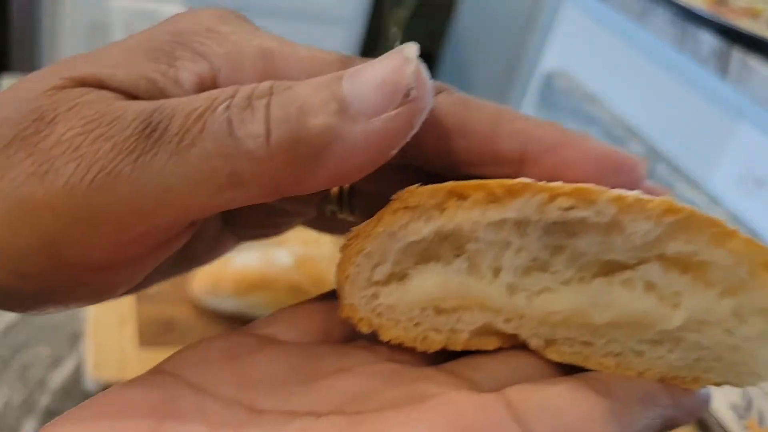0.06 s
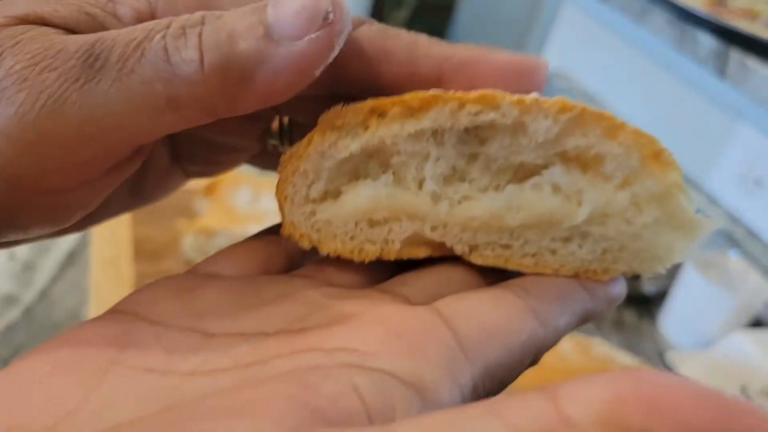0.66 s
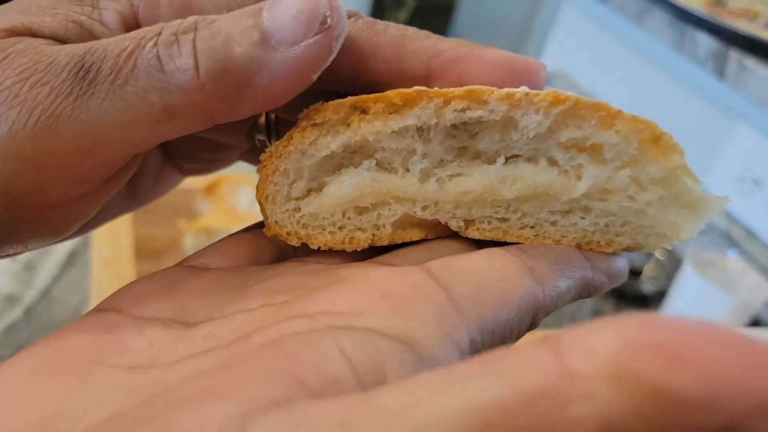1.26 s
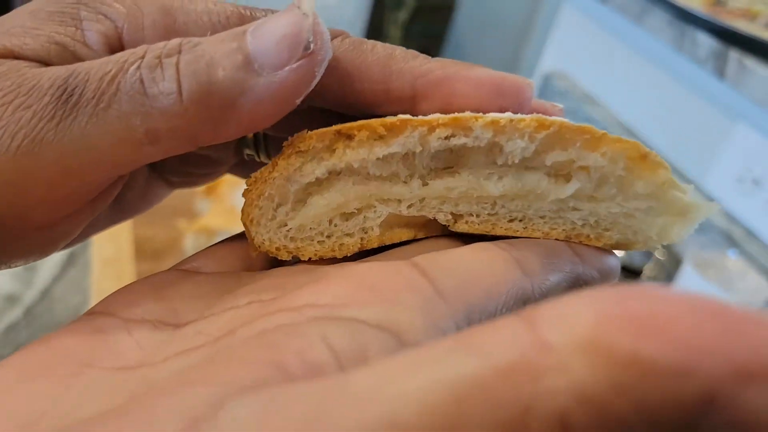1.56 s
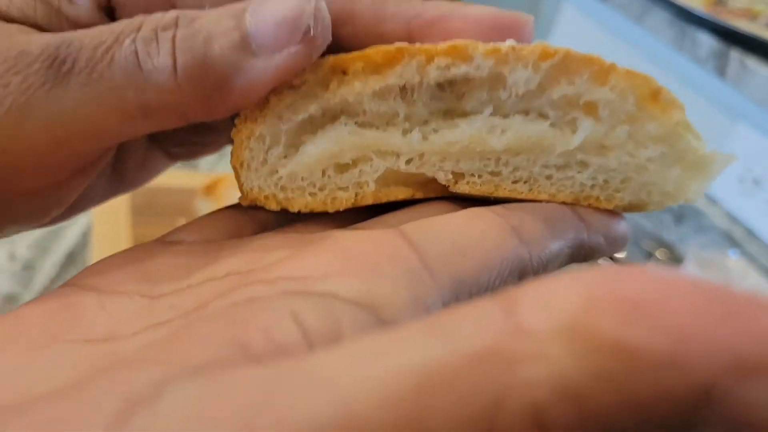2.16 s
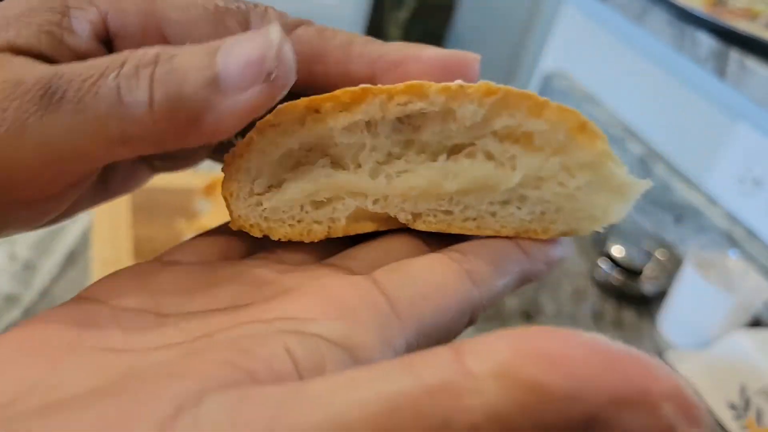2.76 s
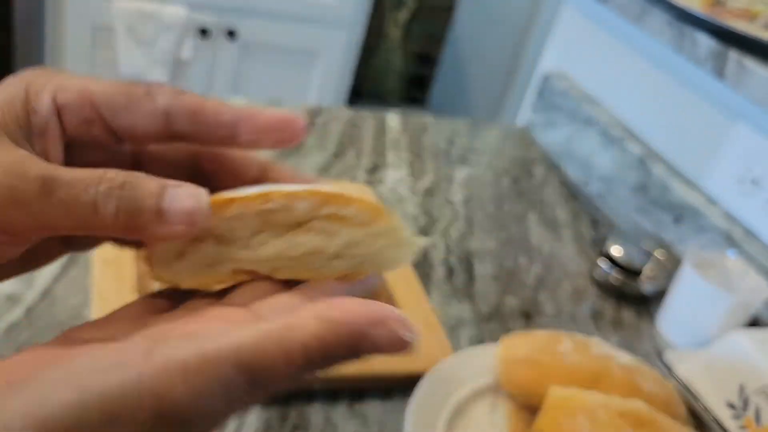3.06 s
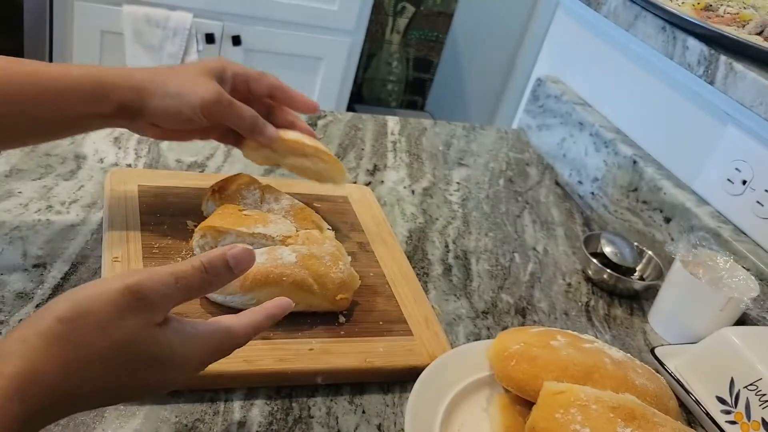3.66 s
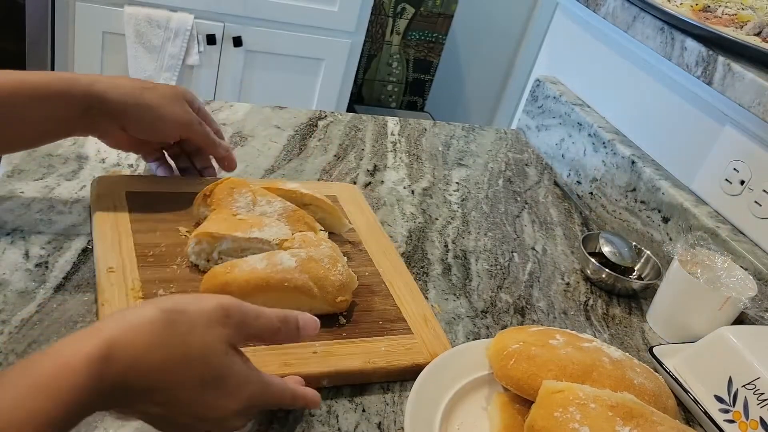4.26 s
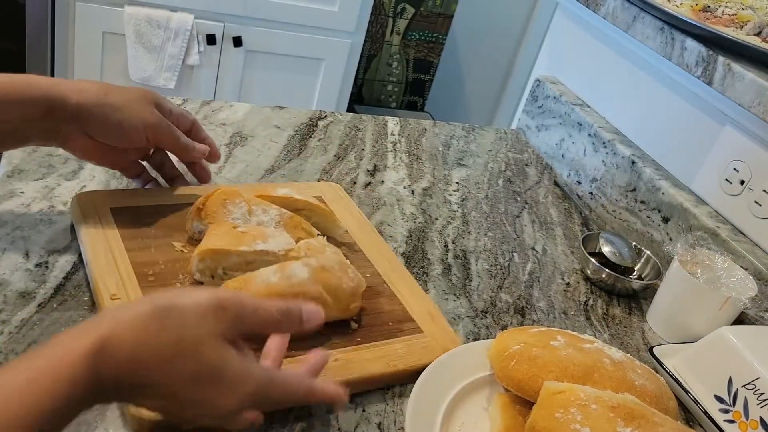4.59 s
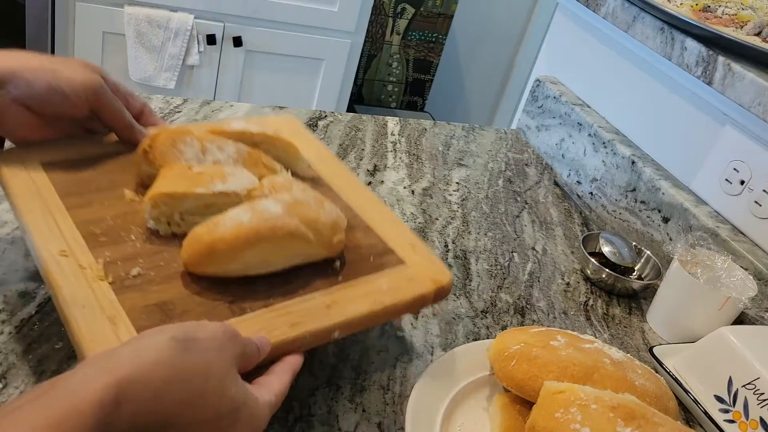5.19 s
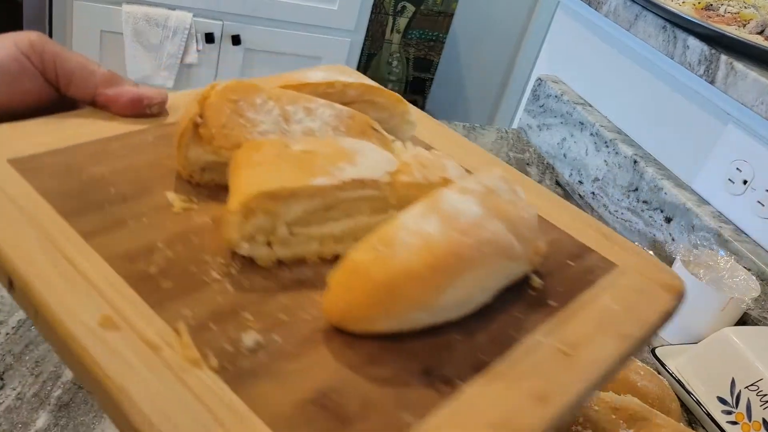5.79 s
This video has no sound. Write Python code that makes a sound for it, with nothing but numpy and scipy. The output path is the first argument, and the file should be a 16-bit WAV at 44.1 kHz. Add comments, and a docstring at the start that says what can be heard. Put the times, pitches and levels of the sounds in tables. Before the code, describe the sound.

In a quiet kitchen with a faint appliance hum, hands squeeze crusty bread close to the microphone. The crust crackles in two waves, the second stronger, then gives a few last ticks. A small clink and light taps follow as the bread is set down. A little further off, a wooden board is pushed over a stone counter with a loud judder, a brief squeak and several knocks.

```python
"""In a quiet, humming kitchen, two hands squeeze a piece of crusty bread close up. The crust crackles and
snaps in two waves, then gives a few last cracks and faint ticks as the grip eases. A small clink follows,
and at about 4 s the bread is set down on a wooden board. Pushed over a stone counter, the board sticks and
slips, first in a judder, then in a squeak; it knocks and is lifted. Hard walls answer bread and board."""
import sys
import numpy as np
from scipy import signal
from scipy.fft import rfft, irfft, next_fast_len
from scipy.io import wavfile
from scipy.ndimage import uniform_filter1d, minimum_filter1d, map_coordinates

SR = 44100
rng = np.random.default_rng(int(sys.argv[2]) if len(sys.argv) > 2 else 0)


def to_wav(s):
    """Save 16-bit WAV."""
    ch = np.atleast_2d(s).T  # columns
    pcm = np.round(np.clip(ch, -1, 1) * 32767)  # PCM
    wavfile.write(sys.argv[1], SR, pcm.astype(np.int16))


N = 266099

# Stereo image. Each row: frequency in Hz, likeness of left and right from -1 to 1.
STEREO_LIKENESS = [(60, 0.66), (180, 0.83), (300, 0.58), (450, -0.092), (800, -0.2), (1600, -.3),
                   (3000, -0.016), (15000, 0)]
# Reverb length. Each row: frequency in Hz, seconds to fall by 60 dB.
KITCHEN_DECAY = [(100, .5), (900, 0.53), (2000, 0.44), (4000, 0.41), (8000, 0.39), (15000, 0.087)]
# Appliance hum. Each row: pitch in Hz, level in dB.
HUM_TONES = [(59.2, -71.5), (134.6, -75.5)]

# Noise colours. Each row: frequency in Hz, relative spectral density in dB.
WALL_EQ = [(80, 0), (400, -5), (900, -4), (2000, 0.5), (4000, -3), (8000, -1), (15000, -2.5)]  # the reverb tail
AIR_EQ = [(20, -40), (47, -14.5), (70, -4), (95, -13.5), (125, -4), (210, -17), (330, -11), (800, -16.5),
          (1100, -20.5), (2300, -28.5), (3500, -27), (7000, -30), (8000, -27.5), (9500, -39),
          (15500, -41.5), (16400, -50.5)]  # the room's air
RUSTLE_EQ = [(80, -19), (250, -1), (480, -4), (620, 1), (780, 0.5), (1100, -10.5), (2200, -18), (3500, -18),
             (7000, -27), (14000, -49)]  # moving hands
RUMBLE_EQ = [(20, -33), (45, -11), (62, 12), (95, -6.5), (200, -33), (600, -72)]  # the low end of that movement
WOOD_EQ = [(180, -58.5), (300, -21.5), (790, -9.5), (872, -20), (1160, -6), (1340, -12.5), (1500, -15.5),
           (1940, -13), (2880, -18), (3520, -16.5), (4170, -31), (5710, -37.5), (9000, -70), (11700, -88.5),
           (19800, -120)]  # the board's dense, short-lived modes
THUD_EQ = [(40, -35), (62, -7.5), (90, 1.5), (120, -1), (170, -1.5), (220, 0.5), (300, 3.5), (500, -4),
           (900, -48)]  # the weight under a knock
TICK_EQ = [(1200, -18), (2500, 4), (5500, 4.5), (7500, -2.5), (10000, -21), (12500, -24), (16000, -31.5)]  # hard contact with the stone
TAP_EQ = [(150, -14.5), (700, 7.5), (1500, -0.5), (3000, 2), (6000, -2), (10000, -9), (16000, -16.5)]  # a light touch
CRUMB_EQ = [(50, -10), (130, -2), (250, -4), (700, 2), (1100, -2), (1700, 1), (2400, -14.5), (4000, -31)]  # the soft inside of the bread
CRUST_EQ = [(530, -43.5), (900, -16), (1110, -15.5), (1520, -14.5), (1820, -16.5), (3150, 0), (4170, -2),
            (4710, 1), (8150, 0), (10300, -7), (12600, -3), (15200, -3.5), (16500, -28)]  # its brittle shell

# Hands and arms move. Each row: fastest moment in seconds, rustle and rumble in dB, rise and fall in seconds.
HAND_MOVES = [(0.05, -72, -62, 0.4, 0.57), (2.19, -61, -63, 0.06, 0.11), (3.59, -55.5, -87, 0.12, 0.2),
              (4.15, -62, -80, 0.11, 0.1), (4.31, -68.5, -62.5, 0.1, 0.12)]
# Fingers, crumbs and board slide.
# Each row: fastest moment in seconds, rub and hiss in dB, rise and fall in seconds.
SLIDE_MOVES = [(4.085, -54.5, -67, 0.027, 0.063), (4.68, -27.5, -53, 0.06, 0.24),
               (5.11, -46.5, -58, 0.088, 0.031), (5.49, -54, -65.5, 0.15, 0.17)]
# The squeak's timbre. Each row: harmonic number, relative level in dB.
SQUEAK_HARMONICS = [(1, -26.5), (2, -22.5), (3, -1.5), (4, -24), (5, -25.5), (6, -29.5), (7, -37.5),
                    (8, -33.5)]
# The board's clear modes. Each row: pitch in Hz, bandwidth in Hz, relative level in dB.
BOARD_MODES = [(505, 24, -21), (632, 31, -7.5), (657, 11, -12.5), (694, 6.7, -11), (744, 12, -22.5),
               (873, 23, -1.5), (1032, 24, -3.5), (1100, 9, -21), (1304, 28, -1), (1402, 18, -19),
               (1790, 20, -8.5), (1905, 16, -9.5), (1973, 33, -6), (2250, 60, -14.5), (2446, 42, -12),
               (2496, 21, -8), (2680, 40, -11), (3080, 100, -16.5)]
# The board hits the counter.
# Each row: start in seconds, level in dB, thud and tick in dB relative to it, brightness in dB per octave.
BOARD_KNOCKS = [(4.594, -40, -20, -18.5, 8), (4.601, -26, -29, -13, 10), (4.648, -4, -20, -38, -6),
                (4.7815, -7.5, -17.5, -5.5, 8.5), (4.791, -6.5, -20.5, -35, 0), (4.968, -18.5, -19, -40, 0),
                (4.975, -13, -21, -42, -1.5), (5.097, -39.5, -5, -24.5, -3.5), (5.493, -31, -29, -17, 7.5)]

# Clicks. Each row: start in seconds, level in dB, dull body in dB relative to it, ring pitch in Hz.
BOARD_TOUCHES = [(4.0558, -43.5, -3.5, 3304), (4.0724, -49, -3, 3500), (4.0943, -46.5, -9.5, 1404),
                 (4.148, -53.5, -9.5, 599), (4.4335, -35, -13, 5550), (4.437, -35.5, -8, 13000),
                 (4.4996, -44, -15.5, 1780), (5.173, -45.5, -22.5, 12300)]  # bread and fingers touch the board
CARRY_CLINK = [(3.2253, -41.5, -6.5, 2720)]  # a pitched tick as the piece is carried off
CRUST_SNAPS = [(0.0398, -26, -14, 9300), (0.2179, -41.5, -28, 8000), (0.3316, -28, -22, 3530),
               (0.389, -28.5, -16.5, 9400), (0.4554, -31.5, -23, 6000), (0.4813, -29, -19.5, 8060),
               (0.5072, -29.5, -35, 12600), (0.5357, -31.5, -23, 4860), (0.5435, -32, -33, 8360),
               (0.5696, -33, -30, 6200), (0.6015, -38.5, -22, 7140), (1.3758, -32, -10.5, 5300),
               (1.3967, -25, -22, 6700), (1.4501, -26.5, -31, 7240), (1.4666, -25.5, -40, 8400),
               (1.5214, -27.5, -40, 12300), (1.5364, -25, -40, 8020), (1.5648, -20.5, -29, 8070),
               (1.5783, -16, -6.5, 7370), (1.6102, -21, -38, 6700), (1.6616, -23.5, -14, 4570),
               (1.7115, -34, -29, 5400), (1.7848, -34, -26, 5040), (1.8696, -28.5, -8.5, 3500),
               (1.1857, -55, -12, 5430), (2.2483, -51, -11, 5340), (2.5227, -35, -29, 3400),
               (2.8983, -48, -16, 5750)]  # the featured cracks of the crust
# The bread is squeezed. Each row: hardest press in seconds, crackle in dB, rise and fall in seconds.
BREAD_SQUEEZES = [(0.505, -48, 0.19, 0.115), (1.595, -36, 0.195, 0.17), (2.545, -62, 0.02, 0.08)]

SQUEEZE_SHAPE = 1.86  # 1 is a pointed swell, 2 a rounded one
FLAKE_HZ, FLAKE_SPREAD_OCTAVES, FLAKE_BODY_DB = 6500, 0.16, -32


def amp(db):
    """Decibels to gain."""
    return 10 ** (np.asarray(db) / 20)


def unit(x):
    """Scale to an rms of 1."""
    return x / np.sqrt(np.mean(x ** 2) + 1e-20)


def crest(x):
    """Scale a burst so that its loudest 2 ms peak near 1."""
    power = uniform_filter1d(np.mean(x ** 2, axis=0), size=88)
    return x / np.sqrt(4 * power.max())


def along(points, hz):
    """Read a curve on a log frequency axis."""
    knots_hz, values = np.transpose(points)
    return np.interp(np.log(hz + 1), np.log(knots_hz + 1), values)


def wobble(per_s):
    """A smooth random curve with per_s knots a second."""
    knots = rng.standard_normal(int(N * per_s / SR) + 4)
    return map_coordinates(knots, [np.arange(N) * per_s / SR])


def onset(t, attack_s):
    """A smooth fade-in from 0 to 1."""
    return 1 - np.exp(-(t / attack_s) ** 2)


def swell(t, peak_s, rise_s, fall_s, shape=1):
    """A gesture's level in dB: 0 at its peak, 20 down one rise before and one fall after."""
    away = np.maximum((peak_s - t) / rise_s, (t - peak_s) / fall_s)
    return -20 * np.abs(away) ** shape


def strokes(rows):
    """The gains of two layers that swell together with every movement."""
    t = np.arange(N) / SR
    return sum(amp([[first_db], [second_db]]) * amp(swell(t, peak_s, rise_s, fall_s))
               for peak_s, first_db, second_db, rise_s, fall_s in rows)


def add(track, start_s, sound):
    """Mix a sound into the track."""
    part = track[:, round(start_s * SR):][:, :sound.shape[1]]
    part += sound[:, :part.shape[1]]


def filtered(x, response):
    """Apply an EQ given as a function of frequency."""
    n = x.shape[-1]
    padded = next_fast_len(n + 4096)
    return irfft(rfft(x, padded) * response(np.fft.rfftfreq(padded, 1 / SR)), padded)[..., :n]


def low_cut(hz, corner_hz):
    """The gain of a 24 dB per octave bass roll-off."""
    return 1 / (1 + (corner_hz / (hz + 1)) ** 4)


def stereo(pair, eq):
    """Two unrelated signals become a coloured stereo pair, alike in the bass."""
    def mid_side_gains(hz):
        angle = np.arccos(np.clip(along(STEREO_LIKENESS, hz), -1, 1)) / 2
        return amp(along(eq, hz)) * [np.cos(angle), np.sin(angle)]
    mid, side = filtered(pair, mid_side_gains)
    return unit(np.array([mid + side, mid - side]))


def noise(eq, length=N):
    """Steady coloured stereo noise."""
    return stereo(rng.standard_normal((2, length)), eq)


def burst(eq, t60, attack_s):
    """A puff of noise that peaks near 1 and dies by 60 dB in t60 seconds."""
    t = np.arange(SR // 10) / SR
    return crest(noise(eq, len(t)) * 10 ** (-3 * t / t60) * onset(t, attack_s))


def room_tone(waver_db=2):
    """The bed: soft air and the unsteady hum of an appliance."""
    t = np.arange(N) / SR
    hum = sum(amp(db + waver_db * wobble(6)) * unit(np.sin(2 * np.pi * hz * t + 0.5 * wobble(36)))
              for hz, db in HUM_TONES)
    return amp(-66.5) * noise(AIR_EQ) + hum


def kitchen_reverb(send, attack_s=0.002):
    """Hard walls answer with a short tail whose treble dies first."""
    hz, t, spectra = signal.stft(rng.standard_normal((2, SR * 2 // 3)), SR, nperseg=256)
    fade = 10 ** (-3 * t / along(KITCHEN_DECAY, hz)[:, None])
    tail = signal.istft(spectra * fade * onset(t, attack_s), SR, nperseg=256)[1]
    tail = stereo(tail, WALL_EQ) / np.sqrt(tail.shape[1])
    return signal.fftconvolve(send.mean(axis=0, keepdims=True), tail, axes=1)[:, :N]


def hands(rough_db=1.5):
    """Moving hands make a soft, uneven rustle and a faint rumble."""
    rustle, rumble = strokes(HAND_MOVES)
    flutter = unit(amp(rough_db * wobble(98)))
    return rustle * flutter * noise(RUSTLE_EQ) + rumble * noise(RUMBLE_EQ)


def slide(rough_db=3):
    """Uneven rubbing sounds the wood while crumbs hiss over it."""
    rub, hiss = strokes(SLIDE_MOVES)
    grip = unit(amp(rough_db * wobble(150)))
    return grip * (rub * noise(WOOD_EQ) + hiss * noise(CRUST_EQ))


def board_squeak(start_s=4.7155, length_s=0.056, pitch_hz=1157, waver=0.0027, rasp_db=-19):
    """The board's edge sticks and slips on stone fast enough to sing: it bites, glides and stops."""
    t = np.maximum(np.arange(N) / SR - start_s, 0)
    bite, glide = amp(-10) * np.exp(-(t / 0.012) ** 2), amp(-26)
    release = np.exp(-np.maximum(t - length_s, 0) / 0.0044)
    envelope = (bite + glide) * onset(t, 0.00088) * release
    phase = 2 * np.pi * np.cumsum(pitch_hz * (1 + waver * wobble(400))) / SR
    tone = sum(amp(db) * np.exp(1j * k * phase) for k, db in SQUEAK_HARMONICS)
    wide_tone = unit(np.array([tone.imag, tone.real]))  # reaches left and right out of step
    return envelope * (wide_tone + amp(rasp_db) * noise(TICK_EQ))


def board_judder(start_s=4.6505, first_gap_s=0.0137, shrink=0.87, thud_db=-24, tick_db=-31, tilt_db=1.5):
    """Knock rows for the pushed board: five slips, each a little sooner and weaker than the last."""
    return [(start_s + first_gap_s * sum(shrink ** j for j in range(k)),
             -0.63 - 0.2 * k, thud_db, tick_db, tilt_db) for k in range(5)]


def board_ring(tilt_db, damping_hz, right_lag_s=0.0002):
    """One blow rings the board's clear modes and a short wash of dense ones."""
    t = np.arange(SR // 4) / SR
    arrival = t - np.array([[0], [right_lag_s]])
    ring = 0
    for k, (hz, width_hz, db) in enumerate(BOARD_MODES):
        strength = (-1) ** k * amp(db + rng.normal(0, 1)) * np.sqrt(width_hz)
        decay = np.exp(-np.pi * (width_hz + damping_hz) * t)
        phase = 2 * np.pi * hz * arrival + 0.49 * rng.standard_normal((2, 1))
        ring += strength * decay * np.sin(phase)
    wood = amp(-1) * crest(ring * onset(t, 0.00091))
    add(wood, 0, amp(-5) * burst(WOOD_EQ, t60=0.033, attack_s=0.00062))
    # Harder contact favours the upper modes; the board radiates little below its lowest.
    return filtered(wood, lambda hz: amp(tilt_db * np.log2(np.clip(hz, 400, 4000) / 1400))
                    * low_cut(hz, 380))


def board_blows():
    """Each knock or slip rings the wood, with a thud below, a tick on top and its own reverb."""
    out = np.zeros((2, N))
    # While slipping, the board is pressed on the counter and rings shorter.
    for rows, damping_hz, send_db in [(BOARD_KNOCKS, 0, -3), (board_judder(), 18, -6)]:
        for start_s, db, thud_db, tick_db, tilt_db in rows:
            blow = board_ring(tilt_db, damping_hz)
            add(blow, 0, amp(thud_db) * burst(THUD_EQ, t60=0.13, attack_s=0.0016))
            add(blow, 0, amp(tick_db) * burst(TICK_EQ, t60=0.0067, attack_s=0.00055))
            add(out, start_s, amp(db) * blow)
            add(out, start_s, amp(db + send_db) * kitchen_reverb(blow))
    return filtered(out, lambda hz: low_cut(hz, 55))


def clicks(rows, eq, t60, splinter_db, splinter_t60, ring_db, ring_q, body_t60):
    """Each click sheds fainter splinters, briefly rings a flake or spot and bumps the body behind it."""
    out = np.zeros((2, N))
    for start_s, db, body_db, pitch_hz in rows:
        resonance = lambda hz: 1 + amp(ring_db) / (1 + 1j * ring_q * (hz / pitch_hz - pitch_hz / (hz + 1)))
        core = burst(eq, t60, attack_s=0.0018)
        splinters = amp(splinter_db) * burst(eq, splinter_t60, attack_s=0.004)
        snap = crest(filtered(core + splinters, resonance))
        body = amp(body_db) * burst(CRUMB_EQ, body_t60, attack_s=0.00066)
        pan_db = rng.normal(0, 2)
        add(out, start_s, amp(db) * (snap + body) * amp([[pan_db / 2], [-pan_db / 2]]))
    return out


def crust_easing(start_s=2.74, span_s=0.15, db=-54):
    """Click rows for three faint ticks as the crust springs back."""
    return [(start_s + span_s * rng.random(), db, FLAKE_BODY_DB,
             FLAKE_HZ * 2 ** rng.normal(0, FLAKE_SPREAD_OCTAVES)) for _ in range(3)]


def crust_flakes(per_s=24, over_crackle_db=8, spread_db=0.5):
    """Click rows for small flakes that break at random, louder the harder the squeeze."""
    rows = []
    for peak_s, db, rise_s, fall_s in BREAD_SQUEEZES:
        span_s = rise_s + fall_s
        count = int(per_s * span_s)
        times = peak_s - rise_s + span_s * (np.arange(count) + rng.random(count)) / count
        for t, (size, detune) in zip(times, rng.standard_normal((count, 2))):
            crackle_db = db + swell(t, peak_s, rise_s, fall_s, SQUEEZE_SHAPE)
            pitch_hz = FLAKE_HZ * 2 ** (FLAKE_SPREAD_OCTAVES * detune)
            rows.append((t, crackle_db + over_crackle_db + spread_db * size, FLAKE_BODY_DB, pitch_hz))
    return rows


def crust_crackle(grains_per_s=520, grain_s=0.00022, spread_db=4, clump_db=1.5, fizz=0.12):
    """Under pressure, countless tiny fractures run through the crust in clumps."""
    t = np.arange(N) / SR
    pressure = sum(amp(db + swell(t, peak_s, rise_s, fall_s, SQUEEZE_SHAPE))
                   for peak_s, db, rise_s, fall_s in BREAD_SQUEEZES)
    size_db = spread_db * np.minimum(rng.exponential(size=N), 4) + clump_db * wobble(120)
    fractures = (rng.random(N) < grains_per_s / SR) * amp(size_db)
    grains = signal.lfilter([1], [1, -np.exp(-1 / (grain_s * SR))], fractures)
    return pressure * stereo((unit(grains) + fizz) * rng.standard_normal((2, N)), CRUST_EQ)


def scene():
    """The mix: bread close and fairly dry, the board further off and deeper in the room."""
    snaps = clicks(CRUST_SNAPS + crust_flakes() + crust_easing(), CRUST_EQ, t60=0.0062,
                   splinter_db=-15, splinter_t60=0.067, ring_db=-0.5, ring_q=3.5, body_t60=0.0098)
    clink = clicks(CARRY_CLINK, TAP_EQ, t60=0.0076,
                   splinter_db=-22, splinter_t60=0.03, ring_db=17, ring_q=8.4, body_t60=0.024)
    bread = snaps + crust_crackle()
    # So small a piece sends only its treble out to the walls.
    bread_treble = filtered(bread, lambda hz: hz ** 2 / (hz ** 2 + 1500 ** 2))
    touches = clicks(BOARD_TOUCHES, TAP_EQ, t60=0.017,
                     splinter_db=-13.5, splinter_t60=0.083, ring_db=10.5, ring_q=11, body_t60=0.017)
    handling = slide() + touches
    squeak = board_squeak()
    send = amp(-7.5) * bread_treble + amp(-2.5) * handling + amp(-9) * squeak + amp(-10) * clink
    reverb = kitchen_reverb(send)
    return bread + clink + handling + squeak + board_blows() + reverb + hands() + room_tone()


def record(dry, ceiling=0.99, top_hz=16300):
    """A fast limiter holds the loudest peaks, then a steep high cut trims the top."""
    needed = np.minimum(1, ceiling / (np.abs(dry).max(axis=0) + 1e-9))
    gain = uniform_filter1d(minimum_filter1d(needed, size=441), size=221)
    return filtered(dry * gain, lambda hz: 1 / (1 + (hz / top_hz) ** 120))


dry = scene()
out = record(dry)
to_wav(out)
```